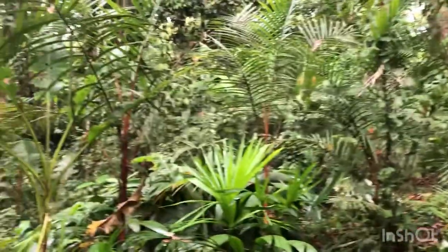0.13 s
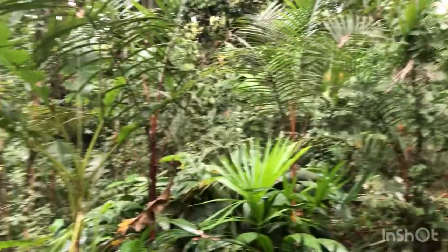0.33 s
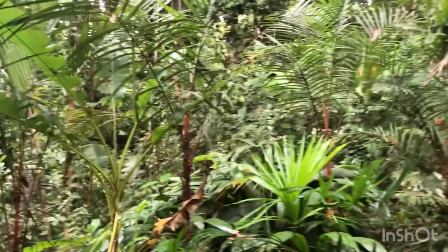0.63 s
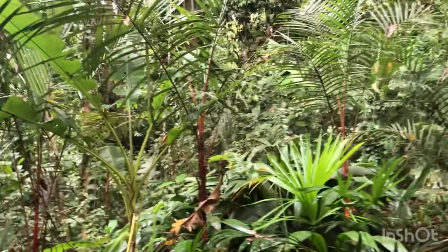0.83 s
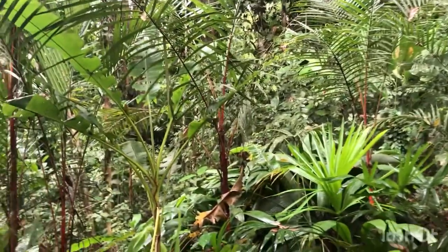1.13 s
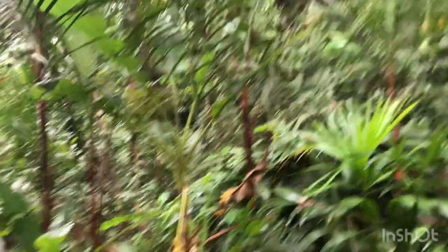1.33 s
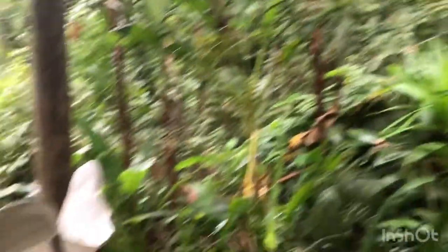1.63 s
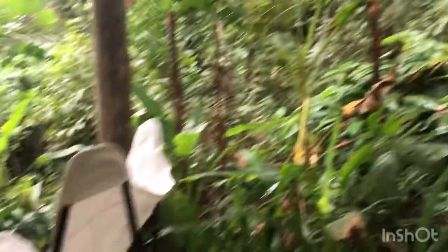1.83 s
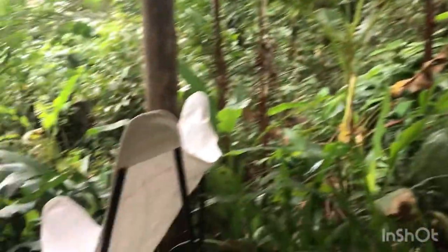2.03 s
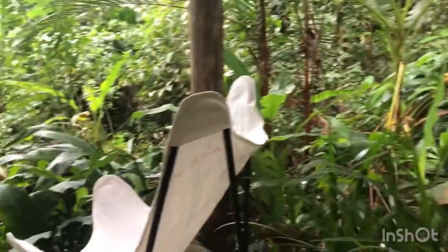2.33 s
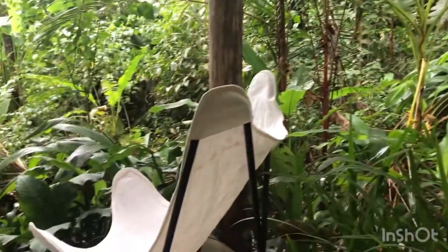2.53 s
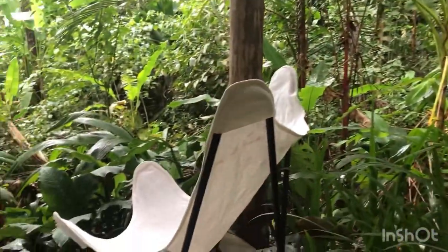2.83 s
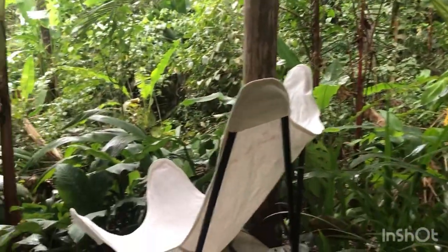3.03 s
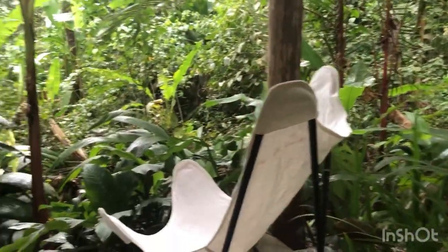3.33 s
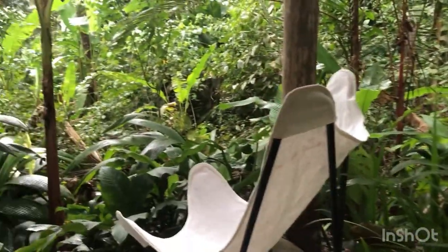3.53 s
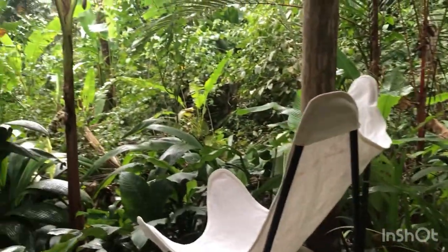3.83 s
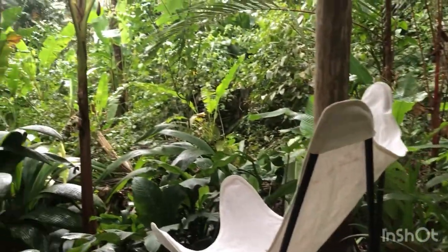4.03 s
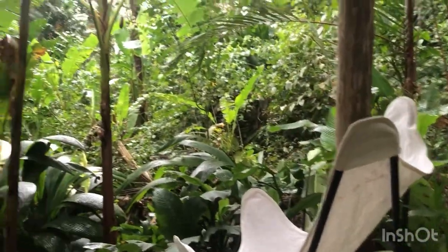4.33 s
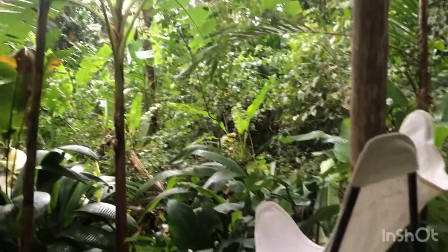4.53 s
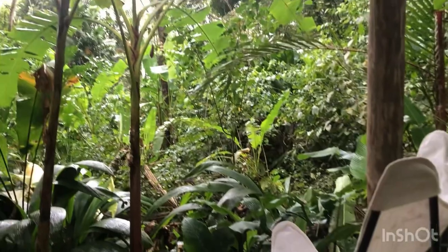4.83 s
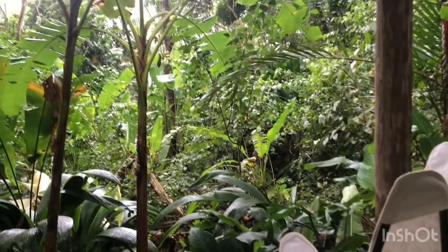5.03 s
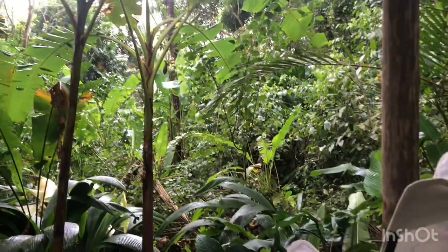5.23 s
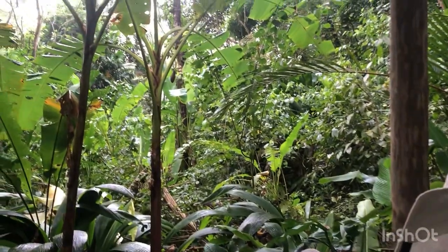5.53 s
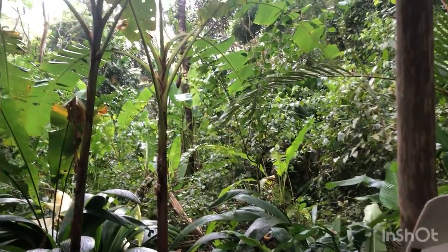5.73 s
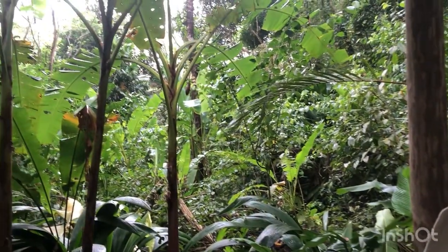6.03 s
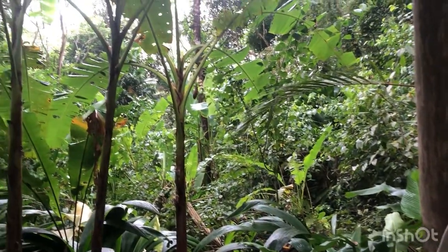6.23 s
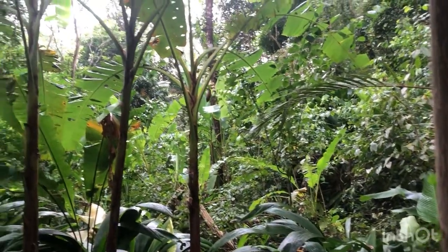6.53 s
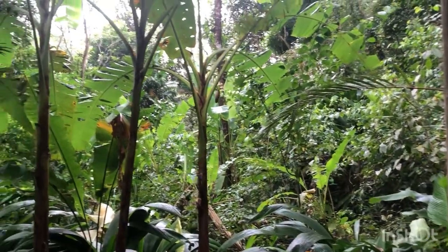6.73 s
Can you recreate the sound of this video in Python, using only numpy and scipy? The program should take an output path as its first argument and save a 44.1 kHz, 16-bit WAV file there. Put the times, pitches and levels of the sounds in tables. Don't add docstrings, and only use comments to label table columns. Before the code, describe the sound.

In a wet rainforest, several tiny tree frogs give short, rising, very high whistles, overlapping at irregular intervals above a distant chorus blurred into a shimmering shrill band. A thin cricket rasp lies just above. Scattered drops snap, patter and thud on nearby leaves over soft steady rain. One heavy drop thumps low about a third of the way in. A small camera microphone hears it all, with little deep bass.

```python
import sys
import numpy as np
from scipy import signal
from scipy.fft import rfft, irfft
from scipy.io import wavfile
from scipy.ndimage import uniform_filter1d

SR = 44100
rng = np.random.default_rng(int(sys.argv[2]) if len(sys.argv) > 2 else 0)


def dump(signal):
    limited = np.clip(np.atleast_2d(signal).T, -1, 1)
    pcm = np.round(limited * 32767).astype(np.int16)
    wavfile.write(sys.argv[1], SR, pcm)


def decibels_to_gain(level_db):
    exponent = np.asarray(level_db, float) / 20
    return 10 ** exponent


N = 303849

# (time [s], level [dB])
HIGH_CALLS = [(.112, -44.5), (.341, -45), (.567, -46.5), (.818, -47.5), (1.07, -46), (1.373, -44),
              (1.704, -43.5), (1.978, -45.5), (2.283, -44.5), (2.664, -47.5), (3.025, -46.5), (3.334, -45),
              (3.68, -43), (3.969, -44), (4.198, -44), (4.454, -43.5), (4.711, -43), (4.979, -42.5)]
UPPER_CALLS = [(.2, -50.5), (.694, -49), (.858, -52.5), (1.253, -54), (1.433, -49), (2.373, -50),
               (2.776, -47.5), (4.111, -50.5), (4.981, -49), (5.21, -44), (5.322, -49), (5.424, -42.5),
               (5.679, -42), (5.94, -43.5), (6.062, -50), (6.178, -44), (6.423, -44), (6.687, -45.5)]
MIDDLE_CALLS = [(.02, -48.5), (.527, -51), (1.078, -51), (1.566, -46.5), (1.808, -46.5), (1.978, -51),
                (2.147, -45.5), (2.337, -53), (2.532, -50), (3.584, -46.5), (3.793, -49.5), (4.011, -47),
                (4.408, -51), (4.454, -45), (5.456, -48), (5.543, -49), (5.907, -51), (6.389, -48.5),
                (6.569, -48.5), (6.789, -47.5)]
LOWER_CALLS = [(.331, -48), (.696, -50), (.986, -49.7), (1.279, -49.5), (1.738, -53), (2.119, -50.5),
               (2.401, -49), (2.674, -48.5), (2.913, -50), (3.151, -49), (3.187, -48.5), (3.36, -45.5),
               (3.562, -51), (3.981, -51), (4.188, -50.5), (4.234, -50), (4.637, -48), (4.825, -46),
               (5.019, -50), (5.104, -50), (5.208, -51), (5.695, -49), (5.795, -49), (5.992, -49),
               (6.088, -48), (6.198, -50.4), (6.324, -49), (6.593, -46.5), (6.842, -47.5)]
HIGH_HZ, UPPER_HZ, MIDDLE_HZ, LOWER_HZ = 6603, 6297, 6110, 5960
# (time [s], level [dB], top pitch [Hz])
DEEP_CALLS = [
    (3.829, -53, 5720),
    (4.675, -57, 5450),
    (4.9, -60, 5480),
    (6.745, -51, 5870),
]
CHORUS_DB = -53

# (time [s], peak level [dB], relative body level [dB])
LEAF_SPLASHES = [(.0393, -47, -13), (0.632, -45, -8), (1.0465, -47, 1), (1.3498, -39.5, -1),
                 (1.673, -54, 6), (2.1495, -59, 0), (2.269, -46.5, 7), (2.424, -49, -1), (2.758, -49, -13),
                 (2.96, -48, 5.5), (3.0405, -49, -9), (3.1462, -48, -10), (3.497, -55, 13),
                 (3.683, -48, -2), (3.7, -47, 6.5), (4.0013, -48.5, 3.5), (4.1912, -45, -1),
                 (4.6545, -47, -4), (4.8409, -45, -10), (5.0596, -53, 4), (5.0746, -48, 1),
                 (5.14, -48, 4.5), (5.6501, -51, 9), (5.787, -46, -5), (6.1669, -51, -5), (6.2417, -52, 0),
                 (6.3899, -51, -8), (6.541, -43, -0.5), (6.0681, -52, -1), (6.8259, -47, -6)]
# (time [s], peak level [dB], ring frequency [Hz])
LEAF_SNAPS = [(.405, -39, 1800), (0.4487, -36, 3280), (0.4542, -33, 2560), (.5208, -39, 4030),
              (1.3493, -40, 3550), (1.6793, -39, 1590), (1.8854, -34, 1730), (2.0832, -33, 2920),
              (2.151, -38, 4440), (2.2667, -36, 1680), (2.426, -37, 4230), (2.6944, -40, 3100),
              (3.311, -37.5, 3200), (3.5144, -29, 1810), (3.6584, -36, 1660), (3.682, -40, 4360),
              (3.6994, -31.5, 1590), (4.0027, -38, 1540), (4.192, -41, 1530), (4.608, -30, 1480),
              (4.732, -42, 1690), (4.8012, -37, 4000), (5.063, -36, 1500), (5.185, -42.5, 2420),
              (5.6501, -42, 1650), (6.154, -40, 1670), (6.4832, -37, 1750), (6.6821, -39.5, 1900),
              (6.7624, -31, 1550), (6.826, -41, 1660)]
# (time [s], peak level [dB], centre frequency [Hz], decay time T60 [s])
FROND_CRACKLE = [
    (.452, -45, 1860, 0.13),
    (2.15, -44, 2860, 0.094),
    (2.426, -50, 2900, 0.13),
]
# (time [s], peak level [dB], ring frequency [Hz])
LEAF_DRUMS = [(.405, -41, 520), (0.436, -39, 1300), (.676, -46, 1200), (.725, -41, 522), (.9, -41.5, 1390),
              (1.296, -43.5, 1230), (1.433, -40.5, 655), (1.609, -37.5, 1000), (1.676, -37, 583),
              (1.847, -41, 1260), (1.886, -38, 680), (2.274, -33.5, 543), (2.427, -43, 990),
              (3.045, -40, 670), (3.513, -37, 730), (3.659, -38.5, 690), (3.678, -46, 970),
              (3.701, -39, 640), (3.856, -37, 1040), (3.949, -48, 504), (4.083, -41.5, 1320),
              (4.586, -39, 643), (4.653, -40, 1360), (4.841, -39.5, 1070), (5.065, -45, 970),
              (5.185, -37.5, 675), (5.29, -41, 507), (5.521, -39.5, 650), (6.167, -35, 1110),
              (6.378, -38.5, 680)]
# (time [s], peak level [dB], ring frequency [Hz])
FROND_THUDS = [(.097, -52.5, 401), (.403, -39.5, 340), (.625, -47, 180), (0.699, -51, 137),
               (1.013, -47, 322), (1.296, -49.5, 239), (1.675, -46.5, 217), (1.889, -49, 308),
               (2.168, -48.5, 190), (2.436, -49, 224), (2.651, -51.5, 214), (2.928, -43.5, 465),
               (3.044, -51, 140), (3.421, -49.5, 348), (3.681, -47, 365), (3.699, -37, 364),
               (3.759, -48.5, 257), (3.946, -43.5, 340), (4.098, -50, 406), (4.395, -47.5, 152),
               (4.606, -45, 348), (4.838, -49, 436), (5.875, -50, 249), (5.948, -47.5, 266),
               (6.065, -47.5, 160), (6.122, -44.5, 345), (6.215, -46.5, 426), (6.314, -48, 336),
               (6.379, -47, 233), (6.824, -44, 253)]
# (time [s], peak level [dB], ring frequency [Hz], decay time T60 [s])
HEAVY_THUMP = [
    (2.272, -34.5, 271, 0.068),
    (2.275, -24.5, 151, 0.082),
    (2.288, -30.5, 277, 0.067),
    (2.294, -40.5, 990, 0.048),
]
SNAP_T60, DRUM_T60, THUD_T60 = 0.0073, 0.045, 0.065

# (frequency [Hz], level [dB per Hz])
PATTER_SPECTRUM = [(30, -35), (100, -2), (150, 2.5), (400, -3), (1500, -6.5), (4000, -12.5), (8000, -21),
                   (15500, -32)]
# (frequency [Hz], level [dB per Hz])
WASH_SPECTRUM = [(25, -24), (50, 3), (100, -3.5), (200, -1.5), (500, -1), (1500, -0.5), (3000, -5.5),
                 (5000, -11), (6800, -23), (7600, -17), (9200, -15.5), (11000, -21), (15500, -22)]
# (time [s], level [dB])
RAIN_LEVEL = [(0, -54.5), (.63, -54.5), (1.4, -55.5), (3.2, -56), (4, -54.5), (5.6, -56), (6.3, -54.5),
              (6.89, -54)]


def peep(top_hz, wet_db, t60, rise=0.083, bend=0.01403, length=0.042, rough=0.48):
    t = np.arange(round(length * SR)) / SR
    hz = top_hz * (1 - rise * np.exp(-t / bend))
    flutter = uniform_filter1d(rng.standard_normal(len(t)), size=70)
    flutter = 1 + rough * evened(uniform_filter1d(flutter, size=70))
    swell = np.sin(np.pi * (t / length) ** .62)
    whistle = flutter * np.sin(2 * np.pi * np.cumsum(hz) / SR) * swell
    heard = decibels_to_gain(wet_db) * signal.fftconvolve(whistle, echoes(t60))
    add(heard, 0, whistle)
    return heard


def echoes(t60, length=.4):
    t = np.arange(round(length * SR)) / SR
    struck = rng.random(len(t)) < .05
    taps = rng.standard_normal(len(t)) * struck * decibels_to_gain(-60 * t / t60)
    return taps / np.linalg.norm(taps)


def near_frogs():
    near = np.zeros(N)
    singers = [(HIGH_CALLS, HIGH_HZ), (UPPER_CALLS, UPPER_HZ), (MIDDLE_CALLS, MIDDLE_HZ), (LOWER_CALLS, LOWER_HZ)]
    peeps = [(s, db, hz) for calls, hz in singers for s, db in calls]
    for s, db, hz in peeps + DEEP_CALLS:
        add(near, s, decibels_to_gain(db + 2.5) * peep(hz, wet_db=1.0, t60=0.21))
    return near


def far_chorus():
    far = np.zeros(N + SR)
    for k, (late, size, pitch) in enumerate(rng.random((420, 3))):
        level = decibels_to_gain(6 * size - 5 * pitch)
        add(far, (k + late) / 55, level * peep(5900 + 520 * pitch, wet_db=7, t60=.45))
    settled = far[SR // 2:][:N]
    return decibels_to_gain(CHORUS_DB) * evened(settled)


def crickets():
    rasp = band(band(rng.standard_normal(N), 6640, 6940), 6640, 6940)
    throb = uniform_filter1d(rng.standard_normal(N), 900)
    throb = evened(uniform_filter1d(throb, 900))
    return decibels_to_gain(-65.2) * evened(rasp * decibels_to_gain(2.2 * throb))


def ring(db, hz, t60, rough, turns=1.0):
    t = np.arange(round(.2 * SR)) / SR
    scuff = evened(band(rng.standard_normal(len(t)), hz * .5, hz * 2.2))
    fall = decibels_to_gain(-60 * t / max(t60, .004)) * np.minimum(t * hz / turns, 1)
    tone = np.sin(2 * np.pi * hz * t)
    return decibels_to_gain(db) * fall * ((1 - rough) * tone + rough * scuff)


def splash(db, body_db):
    t = np.arange(round(.2 * SR)) / SR
    spray, body = rng.standard_normal((2, len(t)))
    fall = decibels_to_gain(-60 * t / 0.0095) + 0.2 * decibels_to_gain(-60 * t / 0.24)
    fall = fall * np.minimum(t / 0.0015, 1)
    bright = evened(band(spray, 3100, 13700))
    dull = decibels_to_gain(body_db + 2.5) * evened(band(body, 1180, 4800))
    return decibels_to_gain(db - 1.0) * fall * (bright + dull)


def drops():
    out = np.zeros(N)
    for s, db, body_db in LEAF_SPLASHES:
        add(out, s, splash(db, body_db))
    for s, db, hz in LEAF_SNAPS:
        add(out, s, ring(db + 2.5, hz, SNAP_T60, rough=.35, turns=.4))
    for s, db, hz, t60 in FROND_CRACKLE:
        add(out, s, ring(db, hz, t60, rough=.95, turns=6))
    for s, db, hz in LEAF_DRUMS:
        add(out, s, ring(db - 1.5, hz, DRUM_T60, rough=.65, turns=1.5))
    for s, db, hz in FROND_THUDS:
        add(out, s, ring(db + 6.5, hz, THUD_T60, rough=0.55))
    for s, db, hz, t60 in HEAVY_THUMP:
        add(out, s, ring(db, hz, t60, rough=0.13, turns=1.1))
    return out + decibels_to_gain(-11) * signal.fftconvolve(out, echoes(.3))[:N]


def patter(per_s, spread_db, lo_hz, hi_hz, t60):
    landed = rng.random(N) < per_s / SR
    size = decibels_to_gain(spread_db * np.minimum(rng.exponential(1, N), 4)) * landed
    shape = signal.lfilter([1], [1, -decibels_to_gain(-60 / (t60 * SR))], size)
    return evened(band(shape * rng.standard_normal(N), lo_hz, hi_hz))


def rain():
    wash = evened(coloured(rng.standard_normal(N), WASH_SPECTRUM))
    low = decibels_to_gain(-17.5) * patter(90, 4.0, 59, 800, 0.14)
    middle = decibels_to_gain(-7.0) * patter(240, 3.5, 423, 4400, 0.05)
    bright = patter(200, 1.1, 3600, 17200, 0.097)
    near = evened(coloured(low + middle + bright, PATTER_SPECTRUM))
    return along(RAIN_LEVEL) * (decibels_to_gain(-2.0) * wash + decibels_to_gain(-1.5) * near)


def evened(x):
    return x / np.sqrt(np.mean(x ** 2) + 1e-20)


def along(rows):
    return decibels_to_gain(np.interp(np.arange(N) / SR, *np.transpose(rows)))


def coloured(x, points):
    f, db = np.transpose(points)
    hz = np.fft.rfftfreq(len(x), 1 / SR)
    gain = decibels_to_gain(np.interp(np.log(hz + 1), np.log(f), db))
    return irfft(rfft(x) * gain, len(x))


def band(x, lo_hz, hi_hz):
    sos = signal.butter(2, [lo_hz, min(hi_hz, SR / 2.1)], "bandpass", fs=SR, output="sos")
    return signal.sosfilt(sos, x)


def add(mix, s, sound):
    part = mix[max(round(s * SR), 0):][:len(sound)]
    part += sound[:len(part)]


def scene():
    return (near_frogs() + far_chorus() + crickets() + drops() + rain())[None]


def low_pass(x):
    return signal.sosfilt(signal.butter(12, 15710, fs=SR, output="sos"), x)


def record(dry):
    bass_cut = signal.butter(2, 58, "highpass", fs=SR, output="sos")
    band_limit = signal.firwin(1023, 15760, window=("kaiser", 9), fs=SR)
    mix = signal.sosfilt(bass_cut, dry[0])
    mix = signal.oaconvolve(mix, band_limit, "same")
    return low_pass(mix)


dry = scene()
out = record(dry)
dump(out)
```